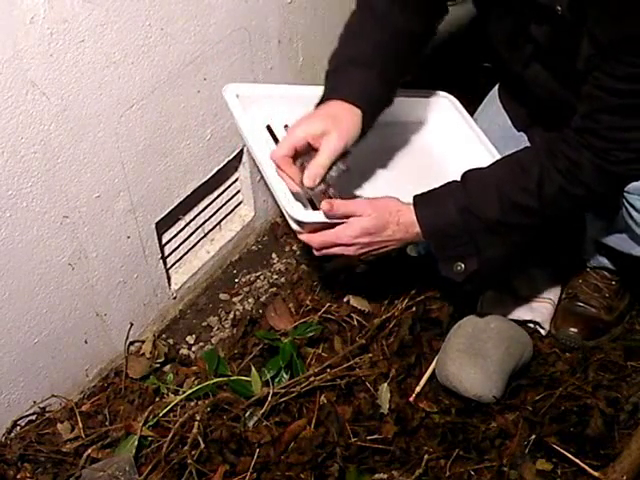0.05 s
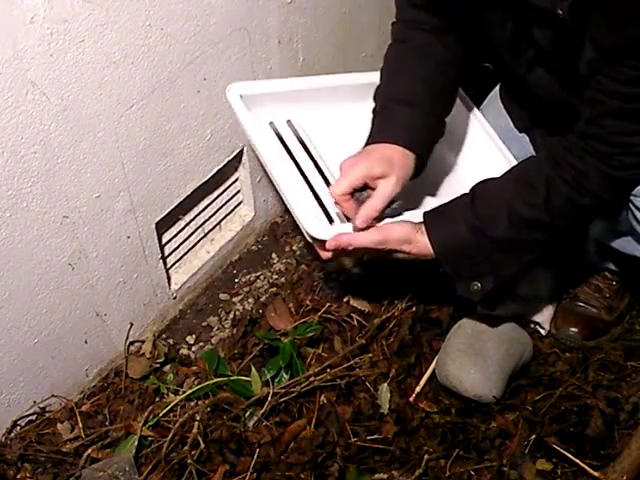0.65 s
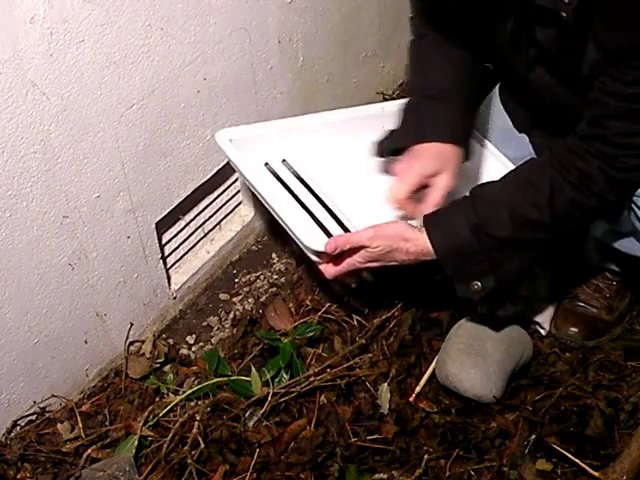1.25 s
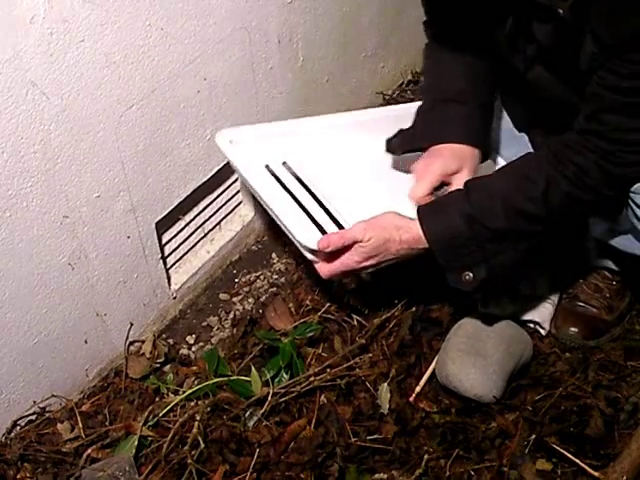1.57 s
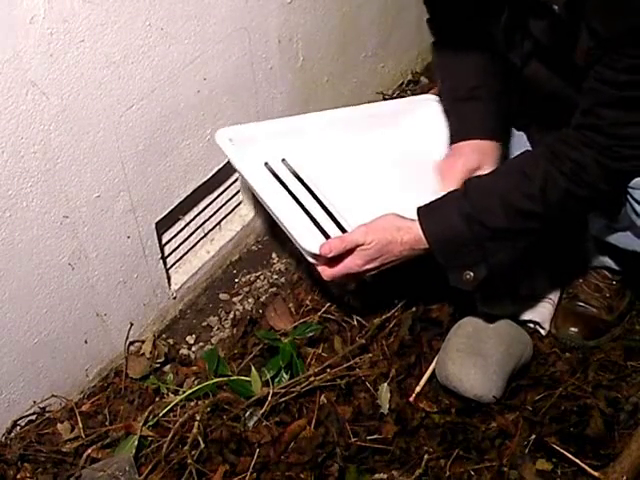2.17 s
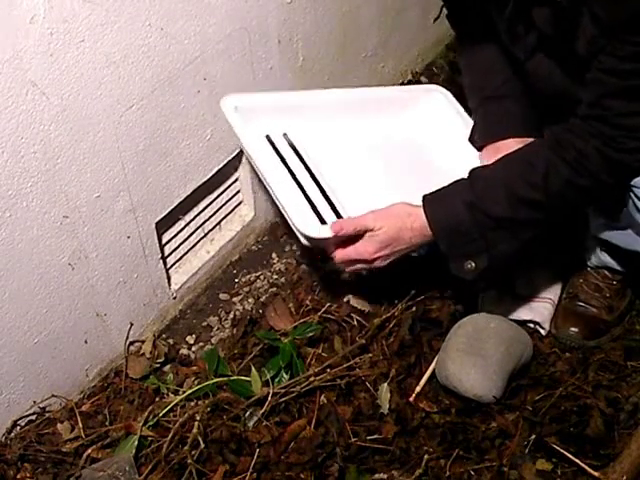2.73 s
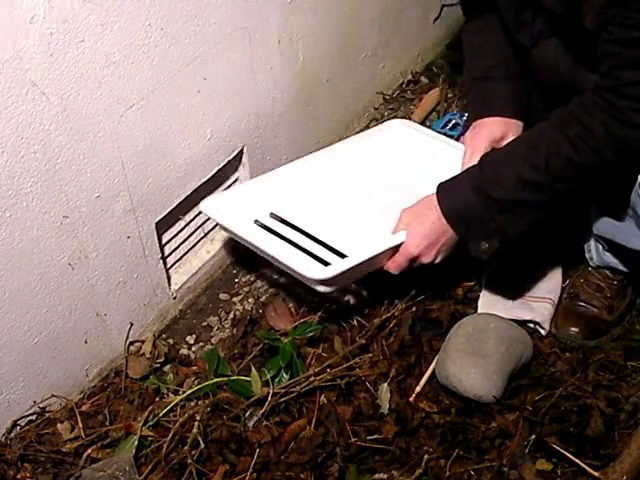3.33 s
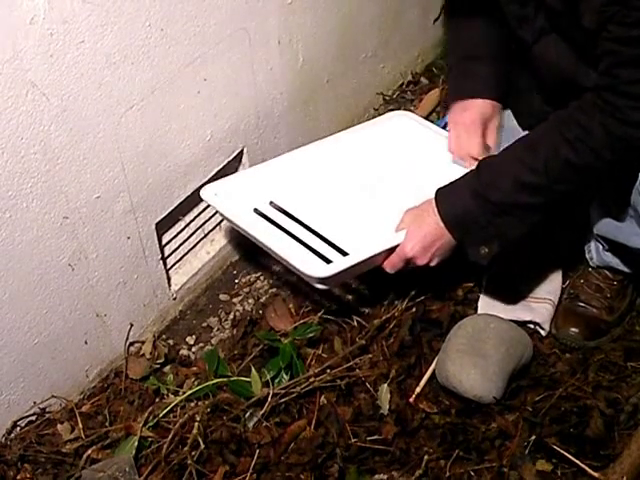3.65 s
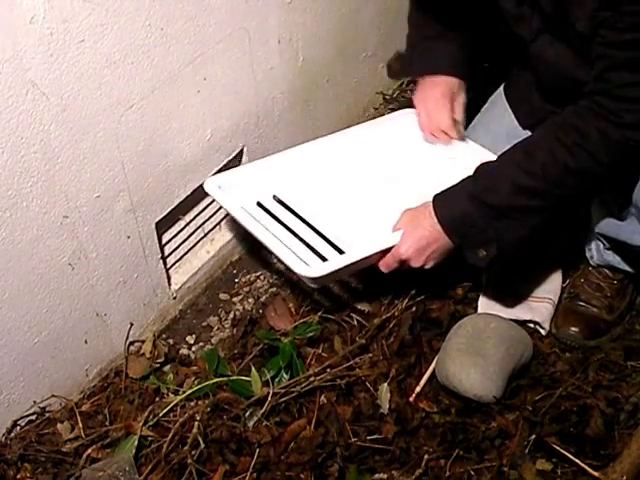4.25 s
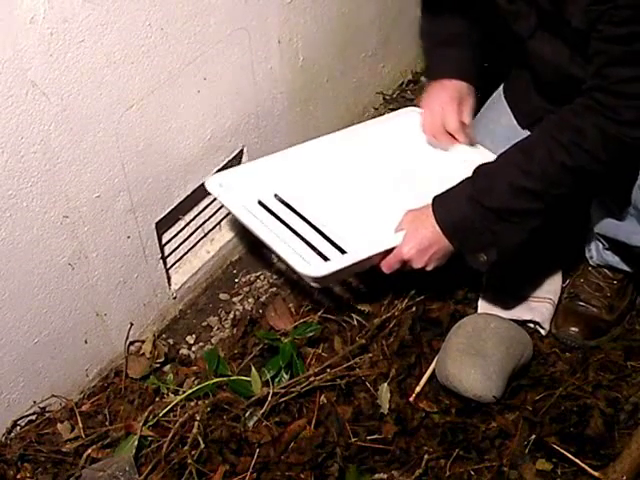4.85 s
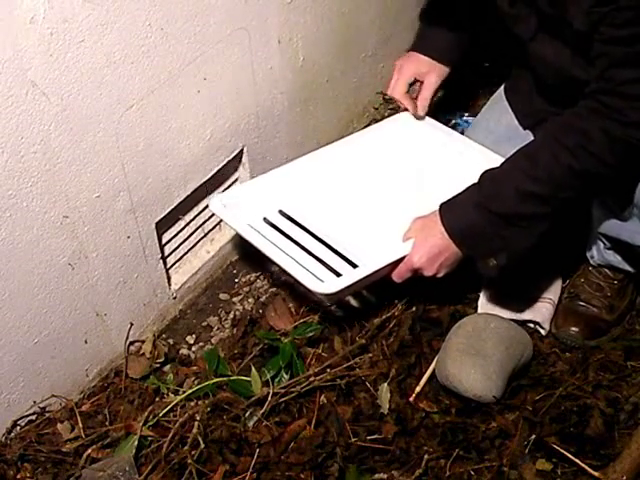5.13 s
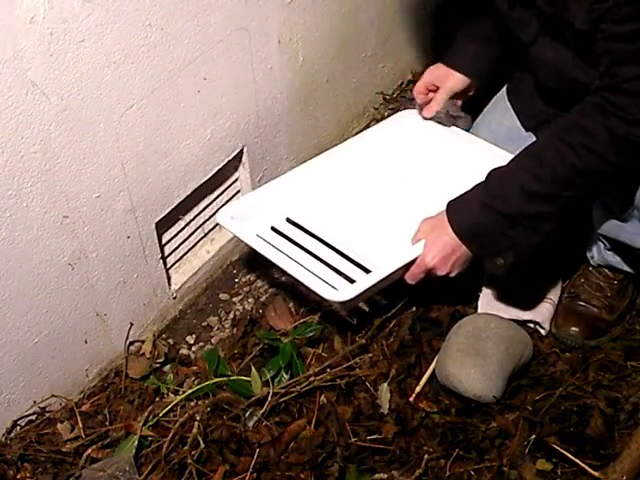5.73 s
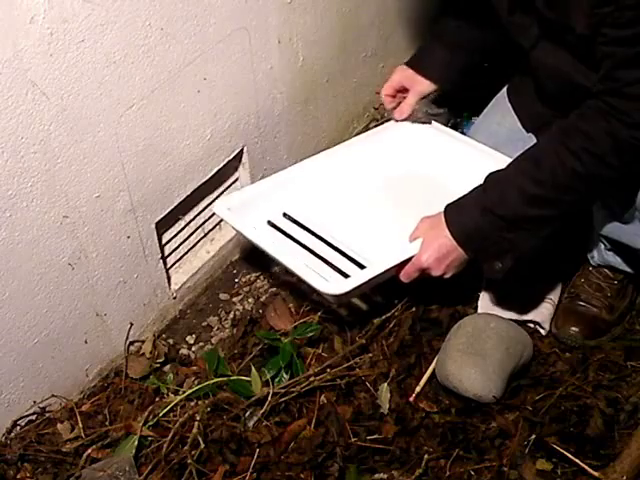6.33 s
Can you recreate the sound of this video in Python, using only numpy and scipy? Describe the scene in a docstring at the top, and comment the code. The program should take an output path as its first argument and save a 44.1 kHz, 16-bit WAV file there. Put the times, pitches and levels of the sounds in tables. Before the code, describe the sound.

Wire wool scrubs a plastic tray in quick, scratchy back-and-forth strokes outdoors, with a few light knocks as the tray is handled.

```python
"""A flower bed beside a house wall, a distant outdoor rush behind, heard on a two-port stereo microphone.
In the foreground a pad of wire wool is scrubbed back and forth on a hand-held plastic tray. In each
stroke countless strands catch and slip: a bright, grainy hiss, with a duller rasp from the tray itself.
The tray ticks and flexes as it is turned; its rim sings faintly when scoured. The wall adds one echo."""
import sys
import numpy as np
from scipy import signal
from scipy.fft import rfft, irfft, next_fast_len
from scipy.io import wavfile

SR = 44100
rng = np.random.default_rng(int(sys.argv[2]) if len(sys.argv) > 2 else 0)


def dump_mix(stems):
    """Bounce the given channels to the path in sys.argv[1] as a 16-bit WAV at rate SR."""
    frames = np.atleast_2d(stems).T  # one column per channel
    limited = np.clip(frames, -1, 1)  # hard clip at full scale
    pcm = np.round(limited * 32767).astype(np.int16)
    wavfile.write(sys.argv[1], SR, pcm)


N = 290927
TIME = np.arange(N) / SR

# strokes, each lasting until the hand next turns; the faintest are rests; levels are relative:
# turn_s, fastest_share (of the stroke's length), hiss_db, brightness_db
HAND_STROKES = [(.3, 0.69, -39.5, 1.5), (.555, 0.51, -40, 2), (.72, 0.65, -35, 1), (.937, 0.58, -35, 4),
                (1.085, 0.65, -32, 3), (1.325, .58, -31, 4.5), (1.491, .64, -32, 6.5),
                (1.677, 0.49, -29.5, 6.5), (1.868, .6, -32.2, 6), (2.056, 0.42, -33, 2.3),
                (2.23, 0.8, -30.5, 8), (2.46, 0.38, -76, -2.5), (2.61, 0.47, -31.5, 13),
                (2.92, 0.32, -57, 1), (3.185, 0.56, -37, -3.5), (3.31, 0.25, -46.5, 0),
                (3.45, 0.76, -36.5, 4.5), (3.769, 0.42, -33.2, 3), (3.966, 0.67, -33, 3.5),
                (4.168, 0.37, -30.5, 5.5), (4.353, 0.58, -34, 7), (4.538, .36, -32, 5.5),
                (4.7, 0.66, -33.5, 9), (4.989, .5, -40, 5), (5.205, .05, -52, 3), (5.27, .5, -68, 2.5),
                (5.43, 0.71, -43, -0.5), (5.52, 0.38, -39, 3), (5.666, 0.68, -33.5, 1.5),
                (5.789, .54, -35.5, -0.5), (5.907, 0.52, -35.5, 2.8), (6.022, .42, -38.5, 1),
                (6.13, 0.53, -35.5, 5.5), (6.272, .5, -40, -0.7), (6.395, 0.62, -32, 5.5),
                (6.536, 0.62, -35.5, 1)]


def from_db(db):
    """Decibels to gain."""
    return 10 ** (np.asarray(db) / 20)


def rms_one(x):
    """Scale to unit power."""
    return x / np.sqrt(np.mean(x ** 2) + 1e-20)


def in_time(rows):
    """Join rows of time_s, value into a curve at every sample."""
    return np.interp(TIME, *np.transpose(rows))


def at_hz(points, hz):
    """Read a spectrum on a log-frequency axis."""
    freqs, values = np.transpose(points)
    return np.interp(np.log(hz), np.log(freqs), values)


def drift(rate_hz):
    """A random wander of rms 1, heading for a new value `rate_hz` times a second."""
    knots = rng.standard_normal(8192)
    return rms_one(np.interp(TIME * rate_hz, np.arange(len(knots)), knots))


def ring(x, hz, t60_s):
    """One mode: a unit click sets off a dying sine."""
    radius, angle = from_db(-60 / (t60_s * SR)), 2 * np.pi * hz / SR
    return signal.lfilter([0, np.sin(angle)], [1, -2 * radius * np.cos(angle), radius ** 2], x + 1e-18)


def decay(x, length_s):
    """Give each impulse an exponential tail."""
    return signal.lfilter([1], [1, -np.exp(-1 / (length_s * SR))], x + 1e-18)


def bell(x, hz, width_hz, db):
    """Raise or lower one band."""
    width, centre = np.sin(np.pi * width_hz / SR), -2 * np.cos(2 * np.pi * hz / SR)
    zero_width, pole_width = width * from_db(db / 2), width / from_db(db / 2)
    return signal.lfilter([1 + zero_width, centre, 1 - zero_width],
                          [1 + pole_width, centre, 1 - pole_width], x)


def brighten(x, db, pivot_hz):
    """Tip the balance between the sound above and below the pivot."""
    low = signal.sosfiltfilt(signal.butter(2, pivot_hz, fs=SR, output="sos"), x)
    gain = from_db(db)
    return (low + gain * (x - low)) / np.sqrt((1 + gain ** 2) / 2)


def coloured(envelope, spectrum, flicker_db, flicker_hz, bands):
    """A pair of noises under one envelope, in bands that each flicker a little; rms 1."""
    edges = np.geomspace(spectrum[0][0], min(spectrum[-1][0], SR / 2 - 1), bands + 1)
    white, out = rng.standard_normal((2, 2, N)) * envelope, 0
    for k, (low, high) in enumerate(zip(edges, edges[1:])):
        band = signal.sosfilt(signal.butter(2, [low, high], "band", fs=SR, output="sos"), white[k % 2])
        out = out + band * from_db(at_hz(spectrum, np.sqrt(low * high)) + flicker_db * drift(flicker_hz))
    return rms_one(out)


def with_side(pair, side_db):
    """Set the width of a mid and side pair."""
    return np.array([pair[0], pair[1] * from_db(side_db)])


def treble_width(pair, bright_db, split_hz):
    """Above the split, bright strokes are heard from the centre and dull ones wide."""
    low = signal.sosfiltfilt(signal.butter(8, split_hz, fs=SR, output="sos"), pair)
    return low + with_side(pair - low, side_db=np.interp(bright_db, [2.7, 4.3], [1.5, -13.5]))


def at_ports(pair, left_lag_s):
    """Mid and side become left and right; the sound reaches the left port a little later."""
    # how differently the two ports hear: frequency_hz, side_gain_db
    port_width = [(30, 0), (70, 6), (160, -0.5), (400, -5), (1700, -8), (2400, -8), (2900, -5.5),
                  (4250, -4.5), (5200, -6.5), (8000, -3.5), (9600, -0.5), (15000, -2.5)]
    size = next_fast_len(N)
    hz = np.maximum(np.arange(size // 2 + 1) * SR / size, 1)
    mid, side = rfft(pair, size)
    side = side * from_db(at_hz(port_width, hz))
    left = (mid + side) * np.exp(-2j * np.pi * hz * left_lag_s)
    return irfft(np.array([left, mid - side]), size)[:, :N]


def outdoor_rush():
    """The open air in the distance: a low, gently flickering noise."""
    # spectrum of the rush: frequency_hz, density_db
    rush_spectrum = [(25, -9.5), (70, -7), (130, -6.5), (180, -3), (245, -10), (330, -4), (500, 0.5),
                     (900, 1.5), (1400, -1.5), (2200, -9.5), (3500, -24.5), (9000, -21.5), (15000, -29)]
    rush = coloured(1, rush_spectrum, flicker_db=1.1, flicker_hz=10, bands=24)
    return with_side(from_db(-49.5) * rush, side_db=-7.0)


def wall(x, delay_s, echo_db, sway):
    """The nearby wall returns one echo, whose path changes as the tray moves."""
    lag_s = delay_s * (1 + sway * drift(2))
    return x + from_db(echo_db) * np.array([np.interp(TIME - lag_s, TIME, channel) for channel in x])


def flexing(rise_s, waver_rad):
    """The whole tray bends and springs back: a few soft, low cycles, made uneven by the gripping hand."""
    # dull thumps as the grip shifts: start_s, peak_db
    grip_shifts = [(.214, -50), (1.112, -55), (1.69, -50.5), (3.318, -50)]
    grip_hz, edge_hz, edge_db, edge_from_s = 131, 167, -51.5, 5.6
    thumps = [(start_s, db, grip_hz) for start_s, db in grip_shifts]
    # while its far edge is scoured, the tray also flexes at every turn of the hand
    thumps += [(turn_s, edge_db, edge_hz) for turn_s, *_ in HAND_STROKES if turn_s > edge_from_s]
    out, uneven = np.zeros(N), waver_rad * drift(110)
    for start_s, db, hz in thumps:
        age = np.maximum(TIME - start_s, 0)
        swell = age / rise_s * np.exp(1 - np.minimum(age / rise_s, 50))
        out += from_db(db) * swell * np.sin(2 * np.pi * hz * age + uneven)
    return out


def knocks(crack_s, scatter_db):
    """A short crack at the contact, then the tray's modes, each struck with a strength of its own."""
    # knocks on the tray: start_s, ring_db, crack_db, favoured_hz (by the spot that is struck)
    strikes = [(1.357, -30, -37, 480), (2.007, -26, -33, 1130), (2.406, -35, -23, 1900),
               (2.721, -36, -18.5, 2400), (2.732, -31, -22, 2400), (2.9725, -29, -23, 1650),
               (2.985, -35, -49, 1650), (5.4274, -26, -26.5, 1160), (5.472, -34, -45, 560),
               (5.499, -32, -52, 695), (6.44, -35, -27, 1700)]
    # the tray's modes: pitch_hz, level_db, t60_s
    tray_modes = [(462, -7.5, 0.15), (750, -20, 0.066), (1103, -7, 0.056), (1210, 1, 0.029),
                  (1557, -13.5, 0.05), (1790, 4.5, 0.051), (1824, 0, 0.027), (2130, -13, 0.018),
                  (2320, -0.5, 0.038), (3640, 4, 0.019), (4360, -4, .012), (4840, -3, .014),
                  (5700, 12, .012)]
    onsets = [round(row[0] * SR) for row in strikes]
    _, ring_db, crack_db, favoured_hz = np.transpose(strikes)
    ringing = np.zeros((2, N))
    for k, (hz, level_db, t60_s) in enumerate(tray_modes):
        clicks = np.zeros((2, N))
        chance_db = scatter_db * rng.standard_normal((len(onsets), 2)).T
        octaves_off = np.abs(np.log2(hz / favoured_hz))
        clicks[:, onsets] = from_db(ring_db + level_db - 5.5 * octaves_off + chance_db - 4.5)
        clicks[1] *= rng.choice([-1, 1])   # each mode leans to one side
        ringing += ring(clicks, hz, t60_s) * (-1) ** (k // 2)
    contact = np.zeros(N)
    contact[onsets] = from_db(crack_db)
    crack = decay(contact, crack_s) * rng.standard_normal((2, N))
    return ringing + signal.sosfilt(signal.butter(1, [1200, 9500], "band", fs=SR, output="sos"), crack)


def rim_contact(idle_db):
    """The pad slides onto the rim and off again, each pass one smooth arch."""
    # passes over the rim: middle_s, length_s, level_db
    passes = [(0.467, 0.28, -3), (1.637, 0.12, -7), (2.42, 0.1, -15), (3.577, 0.61, 0), (5.78, 1, -3.5)]
    arches = [from_db(db) * np.cos(np.pi * np.clip((TIME - middle_s) / length_s, -.5, .5))
              for middle_s, length_s, db in passes]
    return from_db(idle_db) + sum(arches)


def rim_ring(tufts):
    """Slipping tufts of wool keep the rim's resonances singing."""
    # the rim's modes: pitch_hz, level_db, t60_s
    rim_modes = [(2397, -3, 0.025), (2760, -8.5, 0.013), (3210, -7.5, 0.012)]
    scour = tufts * rng.standard_normal((2, N))
    return sum(from_db(db) * rms_one(ring(scour, hz, t60_s)) * (-1) ** k
               for k, (hz, db, t60_s) in enumerate(rim_modes))


def hand(last_turn_s, overlap_s, swell_taper):
    """Each stroke speeds up and slows to the turn; gives hiss gain, rasp gain and brightness in dB."""
    typical_hiss_db = -34.5
    hiss_power, rasp_power = np.zeros((2, N))
    ends, brightness = [row[0] for row in HAND_STROKES[1:]] + [last_turn_s], []
    for (turn_s, share, hiss_db, bright_db), end_s in zip(HAND_STROKES, ends):
        fastest = turn_s + share * (end_s - turn_s)
        start, stop = turn_s - overlap_s, end_s + overlap_s   # the springy pad slides on through a turn
        during = (TIME > start) & (TIME < stop)
        speed = np.sin(np.interp(TIME[during], [start, fastest, stop], [0, np.pi / 2, np.pi]))
        rasp_db = -43.5 + 0.73 * (hiss_db - typical_hiss_db)   # follows the force of the stroke
        # friction levels off once the pad slides freely, the rasp sooner than the hiss
        hiss_swell = np.tanh(1.006 * speed ** (swell_taper * 1.13))
        rasp_swell = np.tanh(1.6 * speed ** swell_taper)
        hiss_power[during] += (from_db(hiss_db + 2.5) * hiss_swell) ** 2
        rasp_power[during] += (from_db(rasp_db) * rasp_swell) ** 2
        brightness.append((fastest, bright_db))
    return np.sqrt(hiss_power), np.sqrt(rasp_power), in_time(brightness)


def slips(per_s, size_db, length_s, bed):
    """Envelope of strands letting go: short bursts of uneven size over a bed of tiny ones."""
    energies = from_db(size_db * np.minimum(rng.exponential(1, N), 5)) ** 2
    released = rng.random(N) < per_s / SR
    power = decay(energies * released, length_s)
    return np.sqrt(power / power.mean() + bed)


def scrubbing(hiss_gain, rasp_gain, bright_db):
    """The slipping strands hiss, shake the tray's sheet and set its rim ringing."""
    # the pad shifting in the fingers between strokes: time_s, level_db
    pad_rustle = [(0, -56), (.6, -52.5), (2.9, -50.5), (3.4, -46), (3.75, -48), (5.1, -54), (5.41, -60),
                  (5.46, -54), (6.6, -48)]
    # hiss of the wire strands: frequency_hz, density_db
    wool_spectrum = [(900, -29), (2000, -10), (3200, -3.5), (5100, 0), (6100, -1.1), (7000, 0),
                     (9000, -1.5), (10000, 0.5), (11000, -0.3), (12600, -0.5), (14000, -5.5),
                     (15000, -11.5), (16000, -17)]
    # rasp of the plastic sheet: frequency_hz, density_db
    sheet_spectrum = [(150, -17), (300, -8.5), (450, -2.5), (800, -2), (1300, 0), (2000, 0), (3000, -3),
                      (4500, -10.5), (8000, -13)]
    rustle = from_db(in_time(pad_rustle))
    judder = from_db(0.43 * drift(90))   # of the pad under the fingers

    strands = judder * slips(per_s=2500, size_db=1.8, length_s=0.0004, bed=1.9)
    hiss = coloured(strands, wool_spectrum, flicker_db=1.5, flicker_hz=25, bands=26)
    wool_gain = np.hypot(hiss_gain, rustle)
    dulling_db = 2.5 + 1.4 * rustle / wool_gain   # a resting pad sounds duller than a sliding one
    hiss = brighten(hiss, bright_db - dulling_db, pivot_hz=7240)

    tufts = judder * slips(per_s=330, size_db=1.0, length_s=0.0012, bed=1.55)
    on_rim = rim_contact(idle_db=-21.5)
    rasp = coloured(tufts, sheet_spectrum, flicker_db=1.0, flicker_hz=13, bands=16)
    rasp = brighten(rasp, 5 * on_rim, pivot_hz=1500)
    sheet_gain = np.hypot(rasp_gain * from_db(-1.5), rustle)
    sheet_gain /= np.hypot(1, 0.51 * on_rim)   # the stiff rim passes less on to the sheet
    rim_gain = on_rim * np.hypot(rasp_gain * from_db(1.5), rustle * from_db(-9.5))
    return wool_gain * hiss + sheet_gain * rasp + rim_gain * rim_ring(tufts)


def scene():
    """The tray before the wall, over the far rush; built as mid and side, heard as left and right."""
    hiss_gain, rasp_gain, bright_db = hand(last_turn_s=6.68, overlap_s=0.0074, swell_taper=1.205)
    scrub = scrubbing(hiss_gain, rasp_gain, bright_db)
    handling = knocks(crack_s=0.0017, scatter_db=3.8) + flexing(rise_s=0.013, waver_rad=0.82)
    tray = scrub + with_side(handling, side_db=-11.5)
    pair = outdoor_rush() + wall(tray, delay_s=.0031, echo_db=-10.0, sway=0.1574)
    pair = treble_width(pair, bright_db, split_hz=4500)
    return from_db(-1.24) * at_ports(pair, left_lag_s=5e-6)


def record(dry):
    """The microphone ports notch the treble, the left one a little more; the top is cut."""
    # peaks and notch of both ports: centre_hz, width_hz, gain_db
    port_colour = [(7150, 560, 1), (7840, 590, -8), (8720, 1000, 3.5)]
    for hz, width_hz, db in port_colour:
        dry = bell(dry, hz, width_hz, db)
    left = bell(dry[0], hz=9800, width_hz=730, db=-4.0)
    top_cut = signal.ellip(10, .2, 70, 15700, fs=SR, output="sos")
    return signal.sosfilt(top_cut, [left, dry[1]])


dry = scene()
out = record(dry)
dump_mix(out)
```